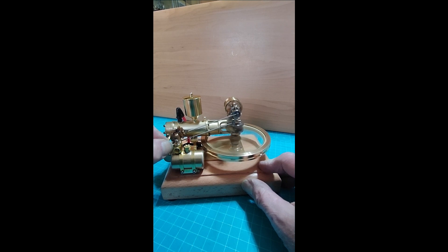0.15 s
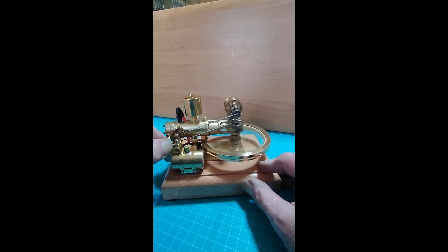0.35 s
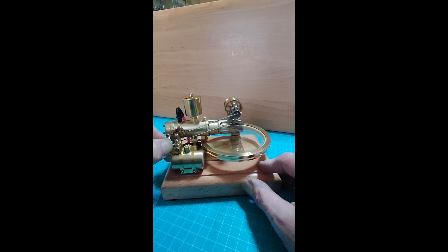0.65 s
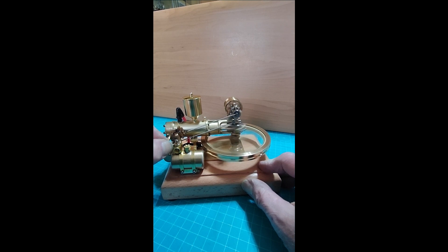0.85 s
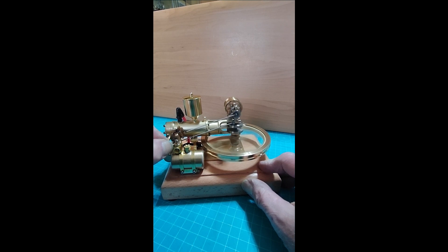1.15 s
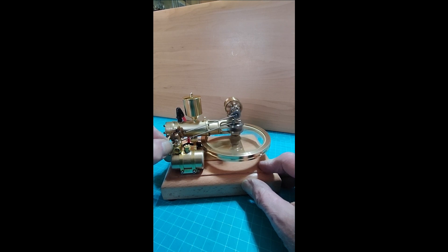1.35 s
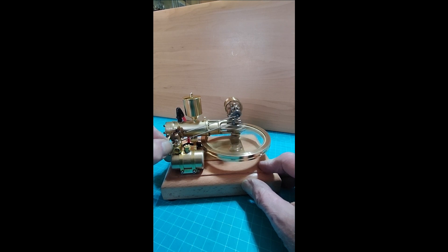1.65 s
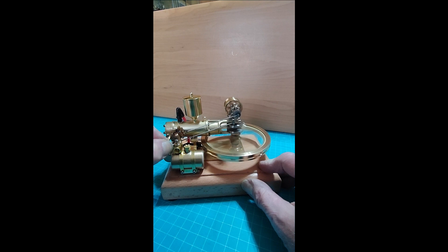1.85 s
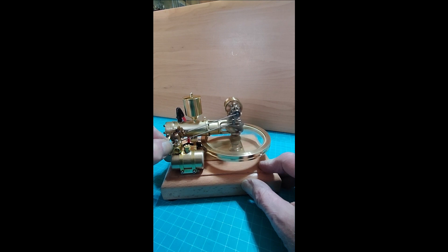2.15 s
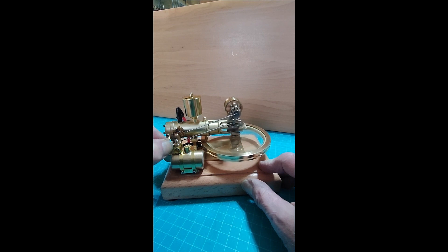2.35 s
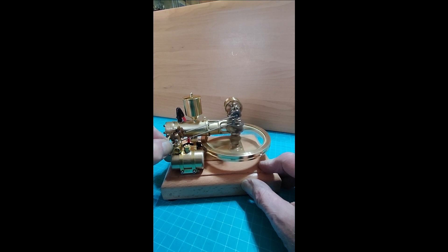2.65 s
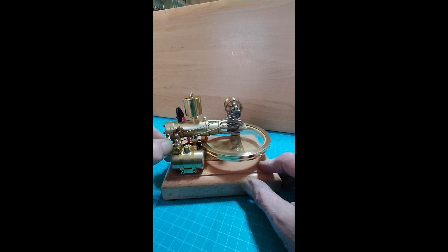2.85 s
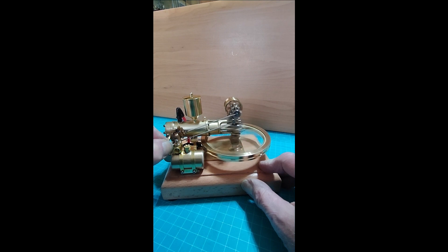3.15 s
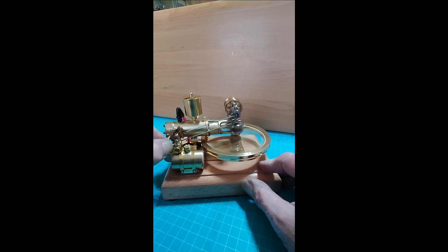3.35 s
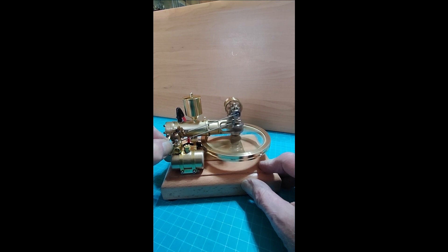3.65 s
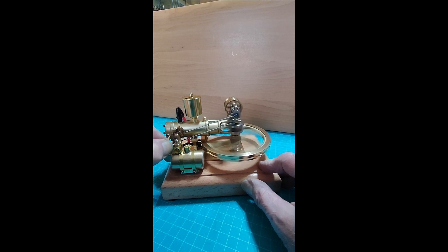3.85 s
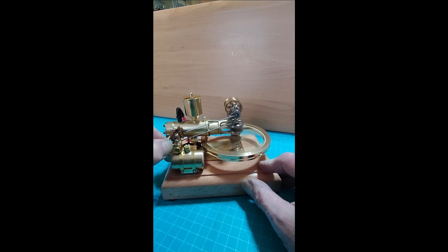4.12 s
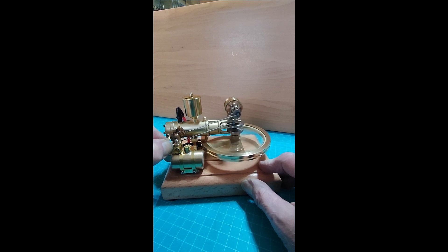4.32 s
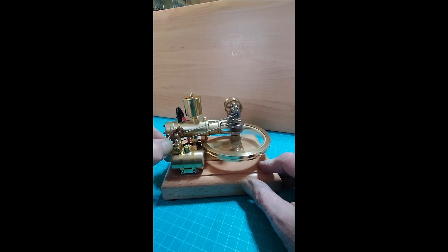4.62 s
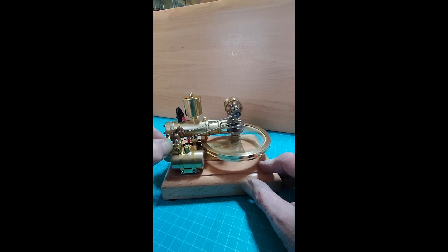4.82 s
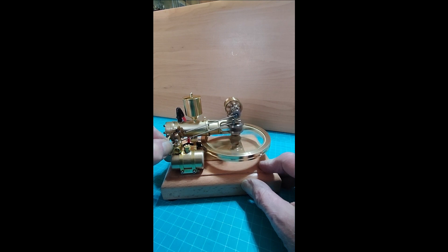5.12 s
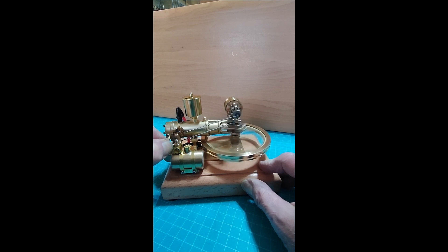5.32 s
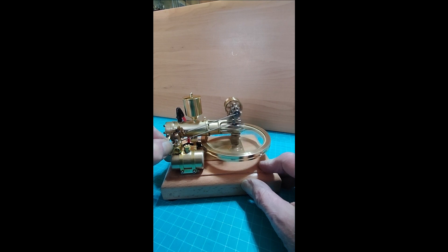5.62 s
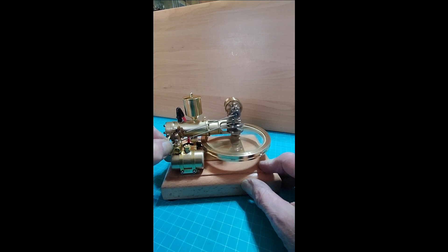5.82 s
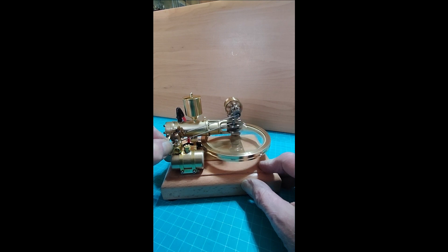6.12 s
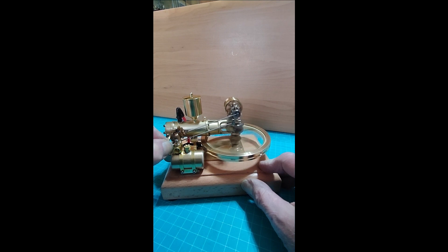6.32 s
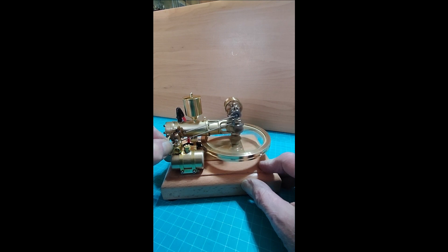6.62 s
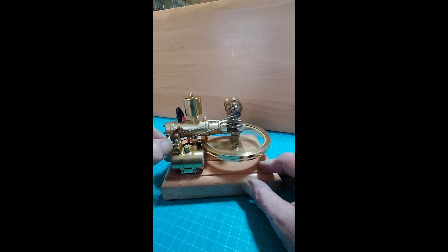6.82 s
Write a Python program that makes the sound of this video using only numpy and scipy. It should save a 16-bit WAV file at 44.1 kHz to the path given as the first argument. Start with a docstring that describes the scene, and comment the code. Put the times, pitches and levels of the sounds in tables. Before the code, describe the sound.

Close up on a bench, a little single-cylinder engine pops unevenly while its valve gear clatters rapidly and its flywheel coasts in a small room.

```python
"""Small room, wooden bench: a small brass single-cylinder engine at about nine turns a second.
It fires every second to fourth turn: a sharp pop, shaped by pipe resonances and a noise rasp, kicks the flywheel,
which coasts and slows with a soft chuff on each missed turn. Pops make brass buzz; a slow miss rattles the linkage.
Every turn, noise bursts locked to the crank make the valve gear's ticks and hiss; tones make its chirp and squeak.
Bearings whirr steadily, and the room adds echoes, standing waves and a diffuse tail."""
import sys
import numpy as np
from scipy import signal
from scipy.fft import rfft, irfft
from scipy.io import wavfile
from scipy.ndimage import uniform_filter1d

SR = 44100
rng = np.random.default_rng(int(sys.argv[2]) if len(sys.argv) > 2 else 0)


def int16_out(signal):
    """Quantize to a 16-bit WAV file."""
    q = np.round(np.clip(np.atleast_2d(signal).T, -1, 1) * 32767)
    wavfile.write(sys.argv[1], SR, q.astype(np.int16))


N = 307377
TIME = np.arange(N) / SR
BLOW = np.sqrt(SR / 100)  # a blow's level is its energy spread over a hundredth of a second

# Firings. Each row: start in seconds, missed turns that follow, pop level in dB,
# brightness of the burn in dB, relative brass ring level in dB.
POPS = [(0.0433, 2, -14, 4.5, -50), (0.3437, 2, -12.5, 2.5, -34), (0.6478, 2, -12, 2, -31),
        (0.9548, 2, -11.5, -1.5, -43), (1.2716, 1, -11.5, 2.5, -43), (1.4817, 2, -12, -4, -39),
        (1.809, 1, -12.5, 2.5, -38), (2.0236, 2, -12.5, -0.5, -38), (2.3548, 1, -12.5, 1.5, -58.5),
        (2.5726, 1, -12.5, -2, -37), (2.7955, 1, -12.5, -3.5, -41), (3.0198, 2, -12, -4, -31.5),
        (3.3732, 1, -12.5, -2, -49), (3.6085, 3, -13, -6, -26), (4.1307, 1, -15.5, 0, -53),
        (4.3835, 1, -12.5, -4, -35.5), (4.6334, 2, -13.5, -3.5, -42), (5.0124, 1, -16, -2.5, -56),
        (5.251, 2, -12.5, 1.5, -61), (5.6048, 1, -14.5, 4, -54.5), (5.8308, 2, -11.5, 1, -35),
        (6.1775, 3, -12, 4, -39), (6.647, 2, -12.5, 3, -40)]
# Exhaust pipe on its wooden base. Each row: resonance in Hz, width in Hz, relative dB in a pop, relative dB in a chuff.
PIPE = [(105, 70, -5, -16), (192, 131, -1, 1), (322.2, 121, 1, 3), (468.6, 109, -7, -28),
        (697, 133, -6, 0.5), (836, 263, -3, -15), (980, 76, -4, 0.5), (1187.8, 156, 0.5, 7),
        (1562, 223, -7, -2)]
# Resonances of the gas jet and engine parts. Each row: centre in Hz, width in Hz, relative level in dB.
JET = [(2400, 880, -5.5), (3420, 860, -13), (4430, 460, -14.5), (5440, 1100, -10.5), (8300, 900, -8.5),
       (9260, 940, 2), (10300, 660, -0.5), (11260, 870, -2.5), (12350, 910, -4), (15100, 1400, -1.5)]
SEAT = [(2000, 2600, -8.5), (3240, 290, -3.5), (4600, 1800, -15), (7830, 1000, -3), (8480, 3900, -4),
        (9790, 820, 3.5), (11290, 640, 6), (12130, 1350, 1), (13300, 1500, -8.5), (15050, 1600, 1.5)]
VALVE = [(3500, 1300, -21), (5700, 860, -18), (9490, 1030, -4), (11700, 2000, -23), (15200, 1500, -40)]
TAPPET = [(7800, 2700, -12), (9900, 290, 4.5), (12100, 8900, -7), (15000, 1500, -9)]
CAM = [(3450, 4400, 3), (9100, 4500, -2), (12400, 1400, 9.5), (15200, 1500, -9)]
PORT = [(3840, 670, -6), (4800, 270, -1.5), (9330, 500, 5.5), (11850, 440, 3), (14950, 490, 2),
        (8800, 14000, -6.5)]
BASE = [(239, 114, 5), (766, 630, -4.5), (1120, 380, -5.5)]
SPRING = [(7250, 150, 3), (7380, 200, 0)]
LINKAGE = [(3820, 660, 4), (5780, 980, 0.5), (11400, 1100, -2)]
LAST_COAST_END_S = 7.002


def amp(db):
    """Decibels to gain."""
    return 10 ** (np.asarray(db) / 20)


def unit(x):
    """Scales to an energy of one."""
    return x / np.sqrt(np.sum(x ** 2) + 1e-20)


def read(points_hz, values, hz):
    """Joins points by straight lines on a log-frequency axis."""
    return np.interp(np.log(hz + 1), np.log(np.asarray(points_hz) + 1), values)


def add(mix, s, sound):
    """Mixes a sound in at s seconds."""
    part = mix[max(round(s * SR), 0):][:len(sound)]
    part += sound[:len(part)]


def response(peaks, top_hz=None, size=4096):
    """Causal, minimum-phase impulse response of a set of resonances, optionally dark above top_hz."""
    hz = abs(np.fft.fftfreq(size, 1 / SR))
    power = sum((amp(db) / (1 + (2 * (hz - f) / width) ** 2)) ** 2 for f, width, db in peaks)
    gain = np.sqrt(power)
    if top_hz:
        gain = gain / np.sqrt(1 + (hz / top_hz) ** 16) + amp(-44.5)
        gain = gain * hz ** 2 / np.sqrt(hz ** 4 + 85 ** 4)  # a small pipe radiates no deep bass
    log_gain = np.log(np.maximum(gain, 1e-4))
    spectrum = np.exp(np.conj(signal.hilbert(log_gain)))
    return unit(np.fft.ifft(spectrum).real[:size // 2])


def ring(modes, rise_s):
    """One blow on a metal part: its modes swell and die away."""
    t = TIME[:SR // 10]
    tone = sum(amp(db - 60 * t / t60) * np.sin(2 * np.pi * hz * t) for hz, db, t60 in modes)
    return BLOW * unit(tone * (1 - np.exp(-t / rise_s)))


def flywheel(drag=.0457, drag_turn_s=.11, drag_power=1.75, coast_power=.89):
    """Every turn as (start s, length s, turns since the pop): each pop kicks the wheel, then friction slows it."""
    rows = []
    ends = [row[0] for row in POPS[1:]] + [LAST_COAST_END_S]
    for (s, misses, *_), end in zip(POPS, ends):
        coasted = np.arange(round(misses) + 1)
        mean_turn_s = (end - s) / len(coasted)
        # slower turns lose more, later ones a little less
        slowing = drag * (mean_turn_s / drag_turn_s) ** drag_power
        lengths = 1 + slowing * coasted ** coast_power
        lengths = lengths * (end - s) / lengths.sum()
        rows += zip(s + np.cumsum(lengths) - lengths, lengths, coasted)
    return rows


def crank():
    """Crank position in turns at every sample; pops and chuffs fall on whole numbers."""
    starts = [s for s, _, _ in flywheel()]
    starts = [2 * starts[0] - starts[1]] + starts + [LAST_COAST_END_S]
    return np.interp(TIME, starts, np.arange(len(starts)))


def pops(rasp_db=-26.0, rasp_scatter_db=1.3, jet_delay_s=.0007, jet_decay_s=.0022,
         wander=.02, pipe_scatter_db=.9, jet_scatter_db=1.5):
    """Burnt gas bursts through the pipe with a brief rasp; a faster burn reaches higher."""
    mid_top_hz, top_hz_per_db = 1338, 14
    tilt_per_db = 0.28  # dB per octave per dB of brightness
    out, t = np.zeros(N), TIME[:SR // 50]
    for s, _, db, bright_db, _ in POPS:
        heat = 1 + wander * rng.standard_normal()  # hotter gas raises the pitch
        peaks = []
        for hz, width, level, _ in PIPE:
            tilt_db = tilt_per_db * bright_db * np.log2(hz / mid_top_hz)
            peaks.append((hz * heat, width, level + tilt_db + pipe_scatter_db * rng.standard_normal()))
        add(out, s - .0001, BLOW * amp(db) * response(peaks, mid_top_hz + top_hz_per_db * bright_db))
        jet = response([(hz * heat, width, level + jet_scatter_db * rng.standard_normal())
                        for hz, width, level in JET])
        rasp = signal.fftconvolve(rng.standard_normal(len(t)) * np.exp(-t / jet_decay_s), jet)
        jet_db = rasp_db + rasp_scatter_db * rng.standard_normal()
        add(out, s + jet_delay_s, BLOW * amp(jet_db) * unit(rasp))
    return out


def chuffs(first_db=-27.5, db_per_turn=-0.97, top_hz=1316):
    """On a miss the cylinder gulps air in: an inverted pipe response, weaker with each further turn."""
    out = np.zeros(N)
    gulp = -response([(hz, width, level) for hz, width, _, level in PIPE], top_hz)
    for s, _, coasted in flywheel():
        if coasted:
            add(out, s - .0003, BLOW * amp(first_db + db_per_turn * (coasted - 1)) * gulp)
    return out


def brass_buzz(trim_db=-2, t60_s=.27, strike_db=0, strike_decay_s=.0033):
    """Each pop strikes loose brass and sets it buzzing: decaying noise through the brass resonances."""
    # Each row: resonance in Hz, width in Hz, relative level in dB.
    brass_peaks = [(5440, 120, -1.5), (5605, 200, 1), (5430, 660, -4)]
    out, t = np.zeros(N), TIME[:SR // 3]
    brass = response(brass_peaks)
    for s, *_, db in POPS:
        envelope = amp(-60 * t / t60_s) + amp(strike_db) * np.exp(-t / strike_decay_s)
        chatter = rng.standard_normal(len(t)) * envelope
        add(out, s + .001017, BLOW * amp(db + trim_db) * unit(signal.fftconvolve(chatter, brass)))
    return out


def linkage_rattle(taut_db=-72, slack_db=-41.5, span_turns_per_s=0.73):
    """On missed turns the linkage slackens as speed falls, and its struck modes rattle louder."""
    # Each row: mode in Hz, relative level in dB, t60 in seconds.
    rattle_modes = [(3240, 0.5, 0.018), (3680, -5.5, 0.014)]
    # Half-slack speed. Each row: time in seconds, speed in turns per second.
    slack_speed = [(1.5, 8.93), (3.0, 8.95), (5.5, 8.51), (7.0, 8.6)]
    out = np.zeros(N)
    rattle = ring(rattle_modes, rise_s=.00017)
    for s, period, coasted in flywheel():
        if coasted:
            shortfall = np.interp(s, *np.transpose(slack_speed)) - 1 / period
            slack = np.clip(.5 + shortfall / span_turns_per_s, 0, 1)
            add(out, s + .00232, amp(taut_db + (slack_db - taut_db) * slack) * rattle)
    return out


def stroke(turns, place, length, db, scatter_db, play):
    """A swell once a turn at one crank angle; also gives the position within the swell."""
    nearest = np.round(turns - place).astype(int) + 1
    strength, slack = rng.standard_normal((nearest.max() + 1, 2))[nearest].T
    u = (turns + 1 - nearest - place - play * slack) / length
    return amp(db + scatter_db * strength - 9.3 * abs(u) ** 3), u


def valve_gear(turns):
    """Each contact or leak is a burst of noise in its own resonances, locked to the crank."""
    # Each row: place in the turn (0-1), half length in turns, level in dB, scatter in dB, resonances.
    cycle = [(-.009, 0.0052, -37, -3, CAM), (.015, 0.017, -46.5, 4, JET), (0.136, 0.19, -46, 5.5, PORT),
             (.203, 0.016, -38.5, -0.5, SPRING), (0.217, 0.0064, -25, 2.5, VALVE),
             (0.22, 0.014, -31, -1.5, BASE), (.357, 0.084, -28, 0.83, SEAT),
             (.455, 0.03, -39.5, -1, SPRING), (0.467, 0.046, -42.5, 1.5, LINKAGE),
             (.573, 0.011, -39, 5, TAPPET)]
    out = np.zeros(N)
    for place, length, db, scatter_db, peaks in cycle:
        swell, _ = stroke(turns, place, length, db, scatter_db, play=.0048)
        out += signal.oaconvolve(swell * rng.standard_normal(N), response(peaks))[:N]
    # the valve spring never quite stops singing
    return out + amp(-66) * signal.oaconvolve(rng.standard_normal(N), response(SPRING))[:N]


def chirp(trim_db=-3.8, fade_db_per_turn=-1.8, scatter_db=2, place=.228, half_s=.0033, wander=.015):
    """The valve stem rubs its guide once a turn: a short rising note, weaker as the wheel coasts."""
    # Each row: time in seconds, level in dB before trim, fade and scatter.
    chirp_level = [(0, -36), (1.3, -33.5), (2.8, -34), (3.4, -43), (3.95, -36), (4.35, -53), (4.85, -38),
                   (5.15, -53), (5.8, -41), (6.3, -34), (6.8, -43)]
    centre_hz, rise_hz_per_s = 2130, 26000
    out, t = np.zeros(N), TIME[:SR // 20] - TIME[SR // 40]
    for s, period, coasted in flywheel():
        strength, detune = rng.standard_normal(2)
        db = np.interp(s, *np.transpose(chirp_level)) + trim_db
        db += fade_db_per_turn * coasted + scatter_db * strength
        hz = centre_hz * (1 + wander * detune) + rise_hz_per_s * t
        note = np.exp(-(t / half_s) ** 2) * np.sin(2 * np.pi * np.cumsum(hz) / SR)
        add(out, s + place * period + t[0], BLOW * amp(db) * unit(note))
    return out


def whistle(turns, hz=3100, width_hz=380):
    """The hiss past the valve carries a fuzzy note, narrow-band noise that weakens early on."""
    # Each row: time in seconds, level in dB.
    whistle_level = [(0, -40.5), (.5, -39.5), (1.0, -39.5), (1.5, -49), (3.0, -48), (7.0, -47.5)]
    db = np.interp(TIME, *np.transpose(whistle_level))
    swell, _ = stroke(turns, place=.37, length=.049, db=db, scatter_db=-0.5, play=.012)
    return signal.oaconvolve(swell * rng.standard_normal(N), response([(hz, width_hz, 0)]))[:N]


def squeak(turns, hz=14200, glide_hz=1100):
    """The piston gives a faint, wavering, falling squeak late in each turn."""
    swell, u = stroke(turns, place=.9, length=.026, db=-50, scatter_db=3, play=.01)
    waver_hz = 1500 * uniform_filter1d(rng.standard_normal(N), size=12)
    pitch_hz = hz - glide_hz * np.clip(u, -2, 2) + waver_hz
    return swell * np.sin(2 * np.pi * np.cumsum(pitch_hz) / SR)


def room(x, onset_s=.008, echo_low_hz=520, echo_high_hz=12500):
    """Wall echoes, a few standing waves and a diffuse tail whose decay varies with frequency."""
    # Standing waves. Each row: frequency in Hz, relative level in dB, t60 in seconds.
    standing_waves = [(203, -1, 0.66), (229.5, -3, 0.6), (339.7, -4, 0.38), (405.5, -9.5, 0.86),
                      (451, 3, 0.42), (513, 1, 0.2), (1012, -10.5, 0.31), (1140, -0.5, 0.31),
                      (1220, -8, 0.21)]
    # Diffuse sound. Each row: frequency in Hz, level in dB, t60 in seconds.
    diffuse = [(61, -11, 0.34), (109, -10, 0.19), (308, -10.5, 0.57), (614, -6, 0.23), (850, -19.5, 0.56),
               (1226, -8.5, 0.26), (2120, -11.5, 0.26), (3470, -11, 0.15), (7500, -18, 0.096),
               (10200, -14, 0.13), (15000, -20, 0.21)]
    # Nearby walls. Each row: delay in seconds, level in dB before the band-pass.
    wall_echoes = [(0.0108, -20), (0.015, -17), (0.0144, -37), (0.017, -18.5)]
    t = TIME[:SR * 3 // 4]
    hz, frame_s, z = signal.stft(rng.choice([-1., 1.], len(t)), SR, nperseg=256)
    points_hz, levels, times = np.transpose(diffuse)
    t60 = read(points_hz, times, hz)[:, None]
    decay_db = read(points_hz, levels, hz)[:, None] - 60 * frame_s / t60
    z *= amp(decay_db) * np.sqrt(2 * np.log(1000) / (t60 * SR))  # level independent of decay time
    tail = signal.istft(z, SR, nperseg=256)[1][:len(t)]
    for mode_hz, db, mode_t60 in standing_waves:
        rate = np.log(1000) / mode_t60
        tail += amp(db) * 2 * rate / SR * np.exp(-rate * t) * np.cos(2 * np.pi * mode_hz * t)
    echoes = np.zeros(SR)
    for s, db in wall_echoes:
        add(echoes, s, amp([db]))
    # panels of limited size reflect little bass and absorb the top
    band = signal.butter(2, [echo_low_hz, echo_high_hz], "bandpass", fs=SR, output="sos")
    echoes = signal.sosfilt(band, echoes)
    add(echoes, onset_s, tail)
    return signal.fftconvolve(x, echoes)[:N]


def whirr(level_db=-46):
    """Steady running noise of the bearings: noise with a fixed spectrum under the strokes."""
    # Each row: frequency in Hz, relative density in dB per Hz.
    whirr_spectrum = [(25, -40), (90, -8.5), (200, 4), (400, -16), (560, -5), (720, 6.5), (1050, 2),
                      (1500, -14.5), (3500, -18), (7000, -17), (11000, -29), (15000, -38)]
    colour = amp(read(*np.transpose(whirr_spectrum), np.fft.rfftfreq(N, 1 / SR)))
    noise = irfft(rfft(rng.standard_normal(N)) * colour, N)
    return amp(level_db) * np.sqrt(N) * unit(noise)


def scene():
    """The engine close by, with the room around it and the bearing noise beneath."""
    turns = crank()
    engine = pops() + chuffs() + brass_buzz() + linkage_rattle()
    engine += valve_gear(turns) + chirp() + whistle(turns) + squeak(turns)
    return (engine + room(engine) + whirr())[None]


def record(dry, edge_hz=15950):
    """Clips at full scale, then low-passes at edge_hz."""
    clipped = np.clip(dry, -1, 1)
    low_pass = signal.firwin(301, edge_hz, window=("kaiser", 8), fs=SR)
    return signal.oaconvolve(clipped, low_pass[None], "same")


dry = scene()
out = record(dry)
int16_out(out)
```